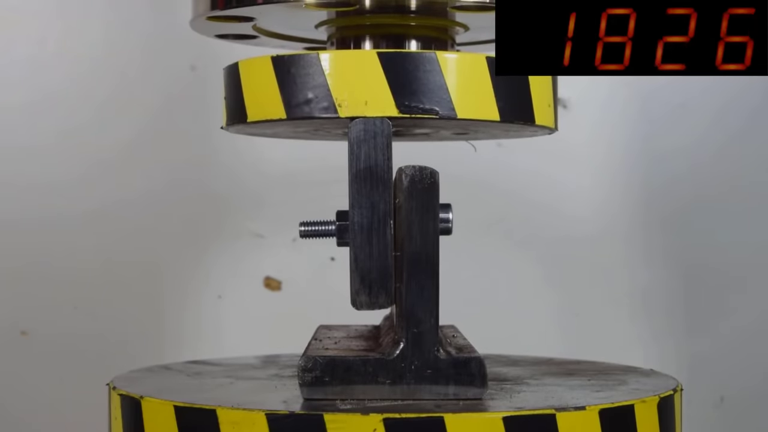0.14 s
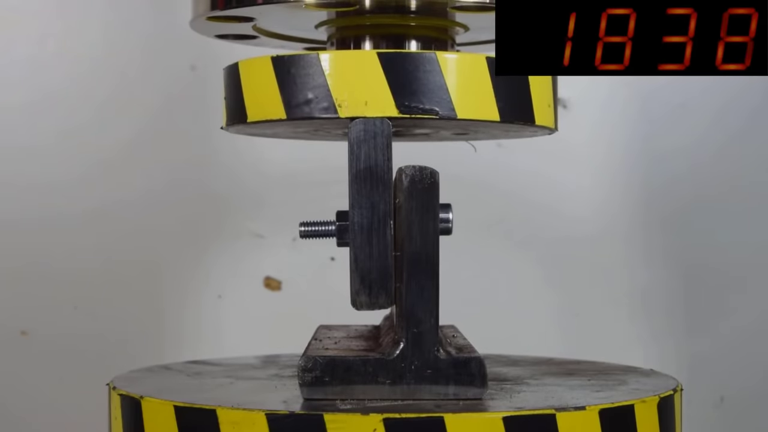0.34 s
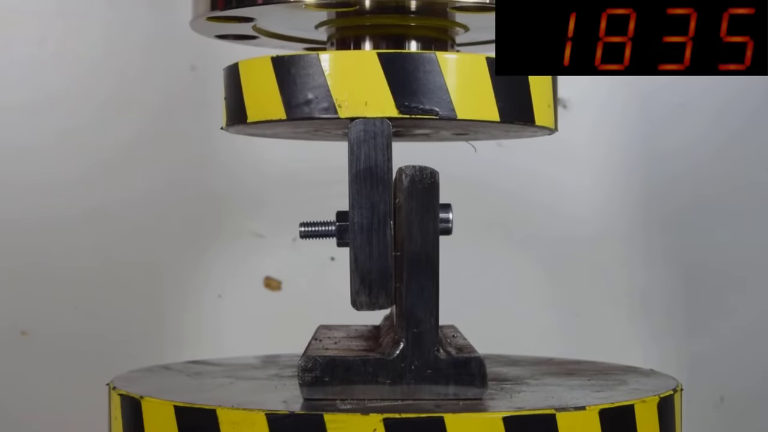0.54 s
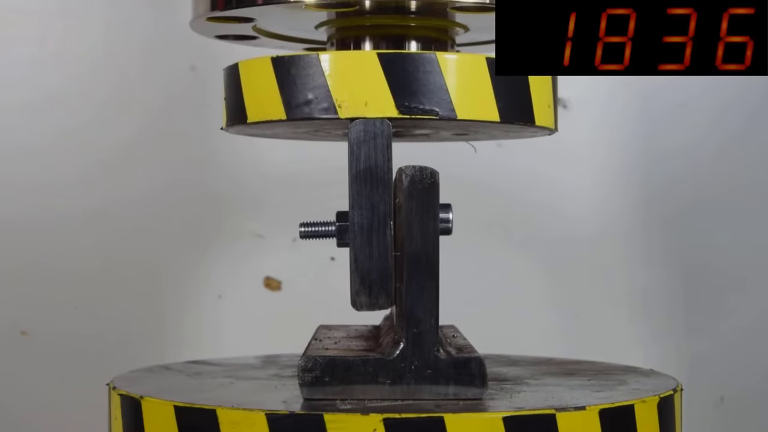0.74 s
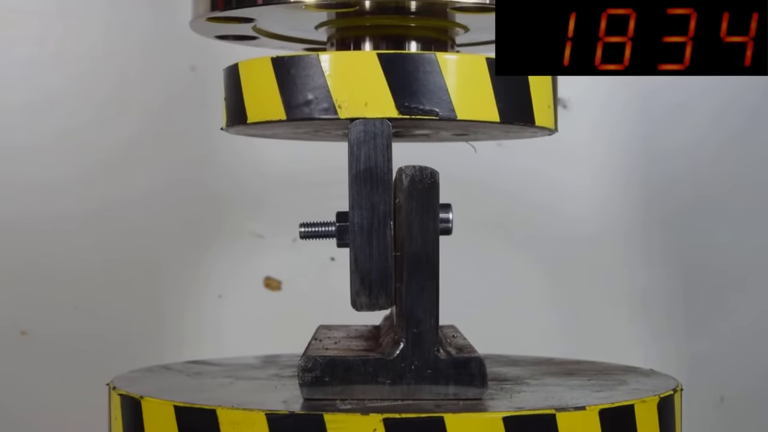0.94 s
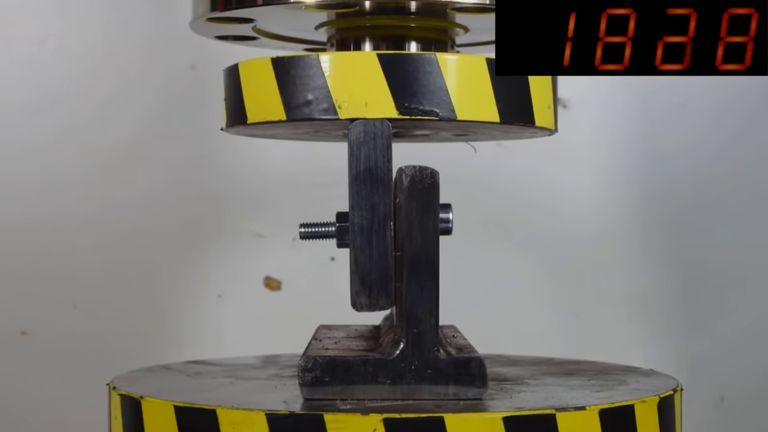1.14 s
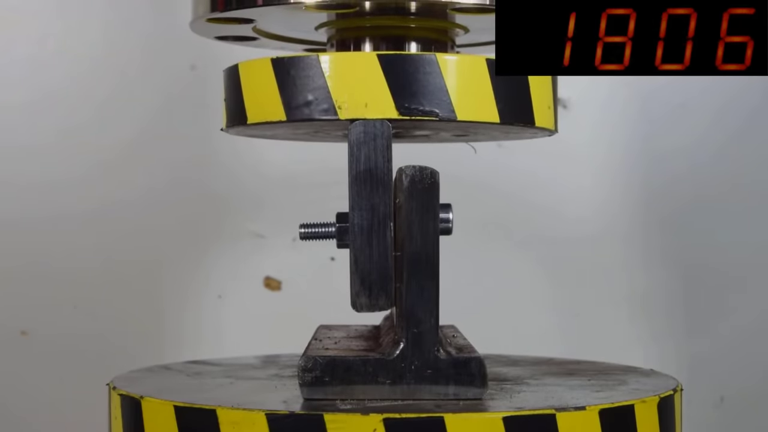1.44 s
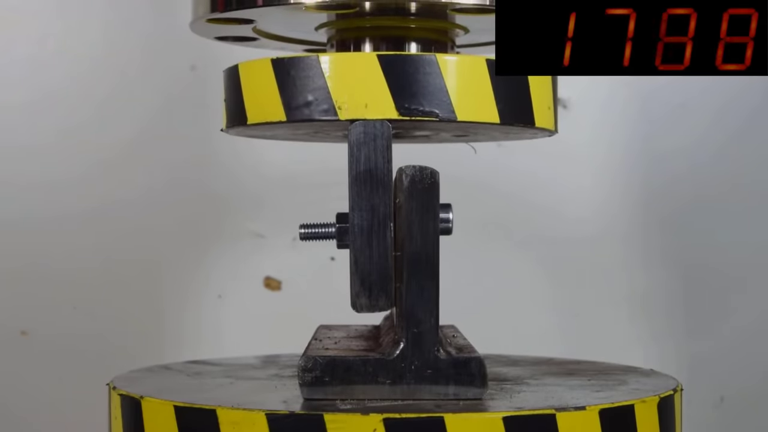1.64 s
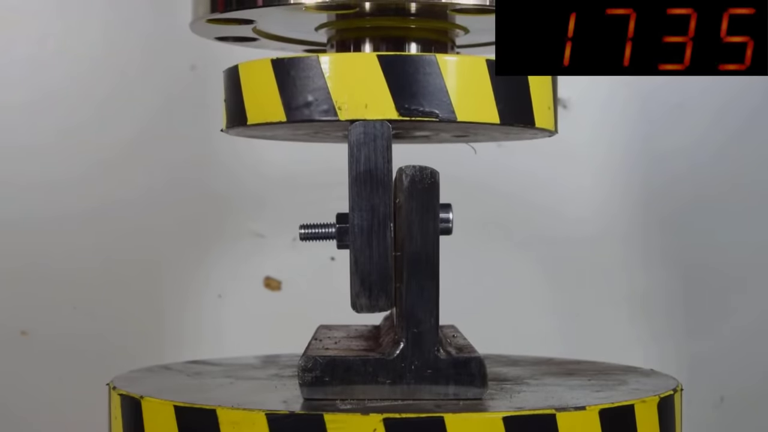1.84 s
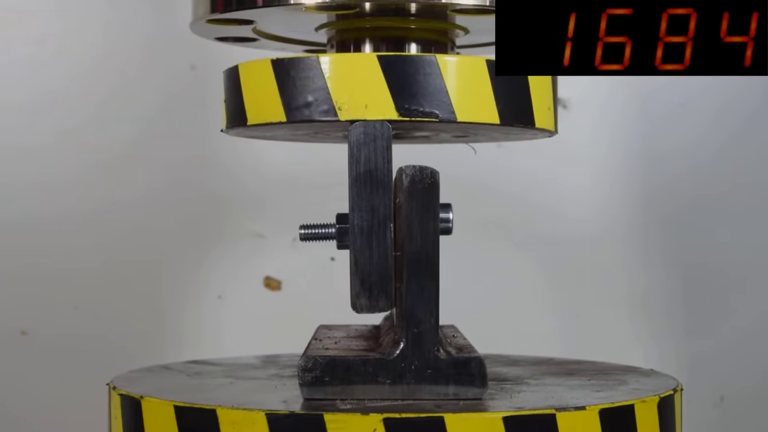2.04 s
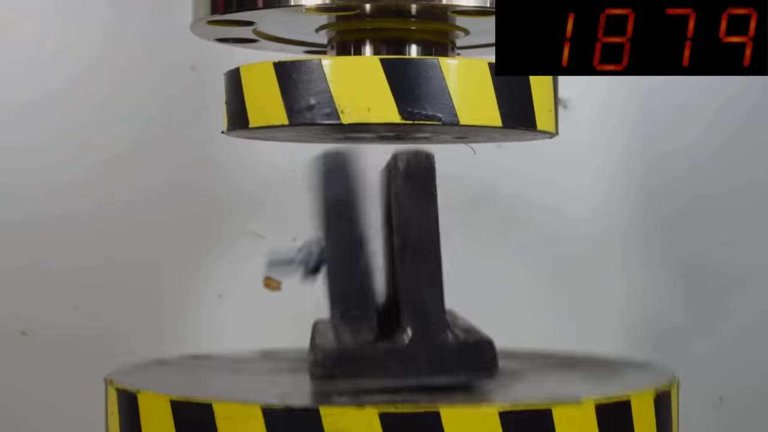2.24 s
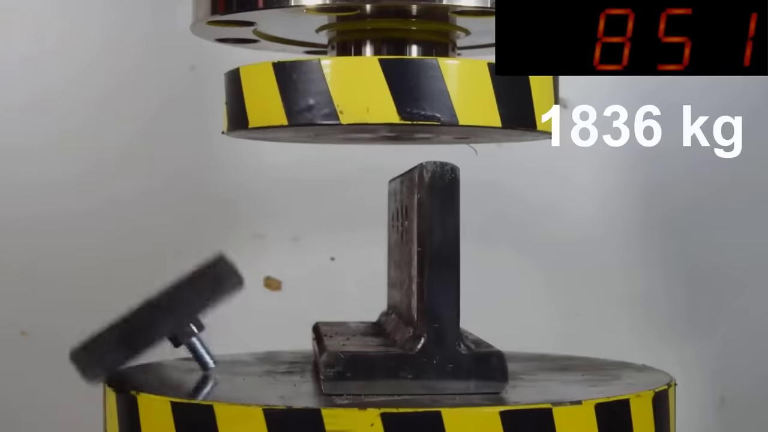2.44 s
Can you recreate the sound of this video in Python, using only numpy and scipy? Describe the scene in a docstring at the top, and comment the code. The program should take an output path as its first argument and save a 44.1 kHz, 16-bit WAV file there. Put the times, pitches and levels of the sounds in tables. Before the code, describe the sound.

A sudden loud crack of a breaking bolt follows the soft, quick knocking of a hydraulic press pump. Heavy steel parts clang and a freed plate clinks and ticks, ringing briefly in the workshop.

```python
"""A workshop, where a hydraulic press shears a steel bolt. Over faint room tone the drive gives a thin,
rising whine and the pump knocks quietly. The strained bolt ticks twice, then snaps: a crack, ringing
steel and a boom of the press frame, and the unloaded fixture slams back. The freed plate clinks, ticks
and starts to land. Contacts are bursts of shaped noise, ringing parts are decaying sine modes.
The room rings on and a limiter holds the peaks down."""
import sys
import numpy as np
from scipy import signal
from scipy.fft import rfft, irfft
from scipy.io import wavfile
from scipy.ndimage import uniform_filter1d, minimum_filter1d

SR = 44100
rng = np.random.default_rng(int(sys.argv[2]) if len(sys.argv) > 2 else 0)


def int16_out(signal):
    """Quantize to a 16-bit WAV file."""
    q = np.round(np.clip(np.atleast_2d(signal).T, -1, 1) * 32767)
    wavfile.write(sys.argv[1], SR, q.astype(np.int16))


N = 114660
CONTACT_RISE_S = .0002


def undb(db):
    """Decibels to gain."""
    return 10 ** (np.asarray(db) / 20)


def since(start):
    """Seconds since a moment, zero before it."""
    return np.maximum(np.arange(N) / SR - start, 0)


def at_hz(points, hz):
    """Read a table on a log-frequency axis."""
    freqs, values = np.array(points, float).T
    return np.interp(np.log(np.maximum(hz, 1)), np.log(freqs), values)


def noise(colour):
    """Noise of unit level with the given spectrum."""
    eq = undb(at_hz(colour, np.fft.rfftfreq(N, 1 / SR)))
    x = irfft(rfft(rng.standard_normal(N)) * eq, N)
    return x / x.std()


def fade(t, t60):
    """Exponential decay by 60 dB in t60."""
    return np.exp(-np.log(1000) * t / t60)


def drift(count):
    """Slow wander: a line through random values spread over the scene."""
    return np.interp(np.arange(N), np.linspace(0, N, count), rng.standard_normal(count))


def repeat(sound, times, dbs):
    """Trigger one sound at each time, at its own level."""
    return sum(undb(db) * np.pad(sound, (int(s * SR), 0))[:N] for s, db in zip(times, dbs))


def bursts(hits, colour):
    """Dense chatter of contacts: noise with an attack, hold and release per hit."""
    envelope = np.zeros(N)
    for start, db, hold, t60 in hits:
        attack = 1 - np.exp(-since(start) / CONTACT_RISE_S)
        envelope += undb(db) * attack * fade(since(start + hold), t60)
    return noise(colour) * envelope


def ring(modes, start, db, rise=CONTACT_RISE_S, hold=0):
    """Modes of a struck part at random phases, held while the push lasts, then decaying."""
    t, released = since(start), since(start + hold)
    tones = sum(undb(db + mode_db) * fade(released, t60) * np.sin(2 * np.pi * (hz * t + rng.random()))
                for hz, mode_db, t60 in modes)
    attack = 1 - np.exp(-t / rise)
    return tones * attack * (t < 1)


# Room tone EQ (frequency [Hz], gain [dB])
ROOM_TONE_EQ = [(15, -58), (25, -15), (190, -9), (301, -8.5), (503, -6.5), (607, -6.5), (1260, -14),
                (1440, -26.5), (1610, -14.5), (1890, -27.5), (2050, -19), (7710, -35.5), (16000, -45.5)]

def room_tone():
    """A faint, steady bed of workshop noise."""
    return undb(-72.5) * noise(ROOM_TONE_EQ)


# Drive pitch curve (time [s], pitch [Hz])
WHINE_PITCH = [(0, 1000), (.5, 998), (0.999, 1011), (1.499, 1013), (2.199, 1022), (2.6, 1022)]
# Steadier harmonics (harmonic number, start level [dB], end level [dB])
WHINE_HARMONICS = [(1, -82, -86), (2, -88, -81), (4, -93, -103), (7, -108, -106), (8, -101, -105)]
# Swelling harmonics (time [s], third [dB], fifth [dB], sixth [dB])
WHINE_SWELLS = [(0, -96, -98, -108), (.2, -95, -92, -106), (.45, -95, -93, -100), (.65, -91, -104, -92),
                (.95, -90, -104, -96), (1.2, -92, -94, -90), (1.55, -91, -102, -108), (2.0, -82, -96, -92),
                (2.2, -81, -102, -101)]

def drive_whine(wander=.00092, waver_db=1.5):
    """The drive's thin whine creeps upward while its harmonics swell in turn."""
    t = since(0)
    hz = np.interp(t, *np.array(WHINE_PITCH).T) * (1 + wander * drift(count=40))
    phase = 2 * np.pi * np.cumsum(hz) / SR
    levels = [(k, np.linspace(first, last, N) + waver_db * drift(count=8))
              for k, first, last in WHINE_HARMONICS]
    times, *swells = np.array(WHINE_SWELLS).T
    levels += [(k, np.interp(t, times, swell)) for k, swell in zip((3, 5, 6), swells)]
    return np.sqrt(2) * sum(undb(db) * np.sin(k * phase) for k, db in levels)


# Pump cues (time [s], knock [dB], clack [dB], chink [dB], valve tick [dB])
PUMP_STROKES = [(0.0838, -49.5, -56.5, -67, -77), (0.2794, -52, -62, -68, -82),
                (0.4928, -51, -63.5, -65, -92), (0.7092, -51.5, -57.5, -70, -76),
                (.895, -50, -66, -69.5, -80), (1.074, -50.5, -63, -64, -87), (1.2559, -51, -57.5, -73, -77),
                (1.4414, -51, -64, -65.5, -82), (1.617, -50, -62.5, -69, -88),
                (1.8002, -51, -57.5, -78, -76.5), (1.9843, -52, -63, -67, -81),
                (2.1601, -50.5, -62, -66.5, -83)]
# Ring of the pump body, linkage, valve and low room modes (frequency [Hz], level [dB], t60 [s])
PUMP_MODES = [(400, -9, .07), (510, 0, .07), (750, -15, .06), (850, -17, .06), (1610, -19, .08)]
CLACK_MODES = [(1204, -1.2, 0.078), (1272, -0.8, 0.045)]
CHINK_MODES = [(2430, -3, .05), (2560, -7, .05), (2800, -5, .07)]
VALVE_MODES = [(5350, -3, .08), (6650, -4, .06), (7600, 0, .08), (7760, -3, .07)]
ROOM_MODES = [(182, -19, .4), (255, -17, .4), (427, -13, .3), (500, -13, .25), (528, -16, .25)]
# Boxy knock and bright valve tick (frequency [Hz], gain [dB])
KNOCK_EQ = [(60, -30), (170, -17), (300, -17), (450, -2), (620, -10), (720, -4), (950, -1), (1400, -7),
            (2000, -15), (2700, -21), (3800, -28), (9000, -48)]
VALVE_EQ = [(1500, -20), (3000, -2), (6500, -1), (9500, -4), (12000, -12), (16000, -20)]

def pump(hold=.017):
    """Each stroke knocks the body, rattles the linkage and ticks the valve; a wall throws it back."""
    def pushed(modes, db, rise=.002):
        return ring(modes, 0, db, rise, hold)

    times, knock_db, clack_db, chink_db, valve_db = np.array(PUMP_STROKES).T
    knock = pushed(PUMP_MODES, db=-5) + bursts([(0, -12.5, hold, .06)], KNOCK_EQ)
    valve = pushed(VALVE_MODES, db=-7) + bursts([(0, -1.5, .0077, .11)], VALVE_EQ)
    clacks = repeat(pushed(CLACK_MODES, db=-2.5), times, clack_db)
    chinks = repeat(pushed(CHINK_MODES, db=-6.5), times, chink_db)
    direct = repeat(knock, times, knock_db) + clacks + chinks + repeat(valve, times, valve_db)
    wall_echo = repeat(direct, times=[.046], dbs=[-10.5])
    room_boom = repeat(pushed(ROOM_MODES, db=-5, rise=.01), times, knock_db)
    return direct + wall_echo + room_boom


# Strain cues (time [s], level [dB], hold [s], t60 [s])
STRAIN_HITS = [(1.329, -70, .008, 0.45), (2.003, -77, .004, 0.22)]
# Thin tick EQ (frequency [Hz], gain [dB])
STRAIN_EQ = [(300, -25), (1500, 2), (4000, 2), (6500, 1.5), (11000, 0), (15500, -16)]

def bolt_strain():
    """The loaded bolt ticks before it gives."""
    return bursts(STRAIN_HITS, STRAIN_EQ)


# Fixture cues (time [s], level [dB], hold [s], t60 [s], clang level [dB])
SLAM_HITS = [(2.2394, -22, 0.0079, 0.42, -31), (2.276, -23.5, 0.0053, 0.057, -23),
             (2.282, -17, 0.011, 0.096, -26.5), (2.322, -35, .002, 0.23, -51),
             (2.373, -29, .0086, 0.32, -50)]
# Full-bodied slam EQ (frequency [Hz], gain [dB])
SLAM_EQ = [(30, -32), (65, -30), (110, -19), (170, -10), (260, -5), (450, 3), (750, -1), (1100, -.5),
           (2400, -1), (3300, -4), (5000, -3), (6500, -12.5), (9000, -19), (15500, -26)]

def fixture_slams():
    """The unloaded fixture strikes the press in heavy blows."""
    return bursts([hit[:-1] for hit in SLAM_HITS], SLAM_EQ)


# Midrange clang (frequency [Hz], level [dB], t60 [s])
FIXTURE_MODES = [(956, -5, .35), (1042, 2, .18), (1065, -5, .3), (1301, -9, .35), (1587, 5, .1),
                 (1607, -8, .35), (2030, -9, .35), (2229, -5, .25), (2414, 1, .5), (2449, -3, .45)]

def fixture_clang():
    """Each blow sets the fixture ringing."""
    return sum(ring(FIXTURE_MODES, start, clang_db) for start, *_, clang_db in SLAM_HITS)


# Fracture and glancing touches (time [s], level [dB], hold [s], t60 [s])
CRACK_HITS = [(2.2409, -19, 0.0061, 0.038), (2.388, -38, 0.0015, 0.013), (2.474, -45, 0.0049, 0.034),
              (2.567, -48.5, .0064, .024)]
# Sharp crack EQ (frequency [Hz], gain [dB])
CRACK_EQ = [(100, -25), (1000, -9), (3700, 10), (6000, -7), (8500, 0.5), (12500, 3.5), (15500, 1)]

def steel_cracks():
    """The bolt fractures, then steel glances off steel in lighter ticks."""
    return bursts(CRACK_HITS, CRACK_EQ)


# High bolt ping and low frame boom (frequency [Hz], level [dB], t60 [s])
BOLT_MODES = [(7200, -12, .15), (9551, -7, .28), (9620, 0, .08), (9932, -9, .12), (10360, -21, .45),
              (11255, -15, .22), (12340, -17, .12), (13930, -21, .2), (14680, -18, .1), (15440, -17, .16)]
FRAME_MODES = [(120, -27, .4), (172, -19, .4), (322, -17, .7), (350, -13, .4), (380, -3, .18),
               (392, 0, .33), (425, -14, .6), (447, -12, .6), (496, -13, .7)]

def snap_ring(start=2.2412):
    """The snapped bolt pings and the released frame booms with a softer attack."""
    return ring(BOLT_MODES, start, db=-10.5) + ring(FRAME_MODES, start, db=-10.5, rise=.0055)


# Recoil and plate landing (time [s], level [dB], hold [s], t60 [s])
THUMP_HITS = [(2.2415, -21, .008, .08), (2.581, -41, .02, .15)]
# Dark thump EQ (frequency [Hz], gain [dB])
THUMP_EQ = [(30, -24), (70, -15), (110, -4), (190, 0), (400, -4), (700, -15), (3000, -38)]

def bed_thumps():
    """The press bed takes two dull blows."""
    return bursts(THUMP_HITS, THUMP_EQ)


# Plate cues (time [s], level [dB])
CLINK_HITS = [(2.2441, -14), (2.389, -13)]
# Bright plate ring (frequency [Hz], level [dB], t60 [s])
PLATE_MODES = [(5238, 0, .16), (5222, -23, .8), (6498, -35, 1.0), (7245, -19, .48), (7263, -17, .45),
               (10365, -36, .45), (11252, -37, .35), (13940, -20, .14), (15440, -28, .2)]

def plate_clinks():
    """The loose plate rings at each knock."""
    return sum(ring(PLATE_MODES, start, db) for start, db in CLINK_HITS)


# Reverb decay before scaling by t60_share (frequency [Hz], t60 [s])
REVERB_DECAY = [(100, 1), (400, 0.74), (1000, 0.77), (2500, 0.59), (5000, 0.43), (9000, 0.35),
                (15000, 0.47)]

def room_response(t60_share, build_s, bass_cut_hz=146):
    """Diffuse workshop tail that builds up, is thin in the bass and dies sooner in the treble."""
    t, freqs = since(0), np.fft.rfftfreq(N, 1 / SR)
    spectrum = rfft(rng.standard_normal(N)) * freqs ** 2 / np.hypot(freqs ** 2, bass_cut_hz ** 2)
    centres = np.geomspace(60, 16000, 10)
    tail = np.zeros(N)
    for hz, weights in zip(centres, np.eye(len(centres))):
        band = irfft(spectrum * np.interp(freqs, centres, weights), N)
        tail += band * fade(t, t60_share * at_hz(REVERB_DECAY, hz))
    tail *= 1 - np.exp(-t / build_s)
    return tail / np.sqrt(np.sum(tail ** 2))


def in_room(x, room, wet_db):
    """Direct sound plus reverb."""
    return x + undb(wet_db) * signal.fftconvolve(x, room)[:N]


def scene():
    """Mono mix: a short reverb on the pump, a longer one on the impacts and ringing steel."""
    long_room = room_response(t60_share=.82, build_s=.017)
    short_room = room_response(t60_share=.45, build_s=.01)
    press = drive_whine() + in_room(pump(), short_room, wet_db=-8)
    impacts = bolt_strain() + fixture_slams() + steel_cracks() + bed_thumps()
    ringing = fixture_clang() + snap_ring() + plate_clinks()
    shear = in_room(impacts, long_room, wet_db=-8) + in_room(ringing, long_room, wet_db=-14)
    return (room_tone() + press + shear)[None]


def record(dry, limit_db=-4.5, hold_s=.0015, release_db_per_s=258, ceiling_db=-7.8):
    """A limiter ducks each peak and recovers steadily; a soft clip follows, and rumble and top are cut."""
    high_cut = signal.ellip(10, .2, 80, 15650, fs=SR, output="sos")
    low_cut = signal.butter(2, 60, "high", fs=SR, output="sos")
    x, span = signal.sosfilt(high_cut, dry), int(hold_s * SR)
    over_db = np.maximum(20 * np.log10(np.abs(x) + 1e-9) - limit_db, 0)
    recovery_db = release_db_per_s * since(0)
    gain = undb(recovery_db - np.maximum.accumulate(over_db + recovery_db, axis=-1))
    limited = x * uniform_filter1d(minimum_filter1d(gain, span), span)
    rounded = limited / (1 + (limited / undb(ceiling_db)) ** 4) ** .25
    return signal.sosfilt(high_cut, signal.sosfilt(low_cut, rounded))


dry = scene()
out = record(dry)
int16_out(out)
```